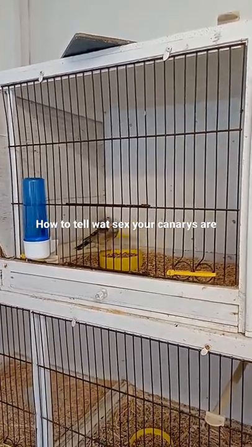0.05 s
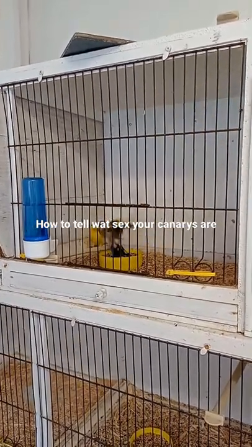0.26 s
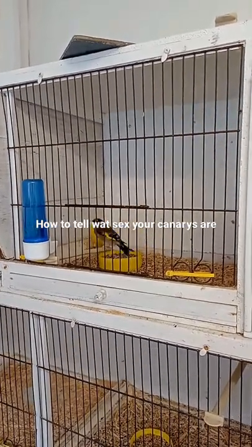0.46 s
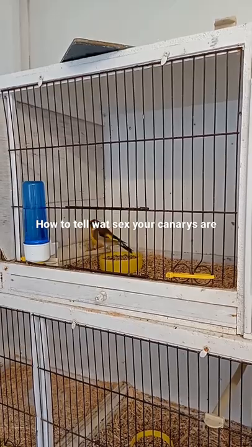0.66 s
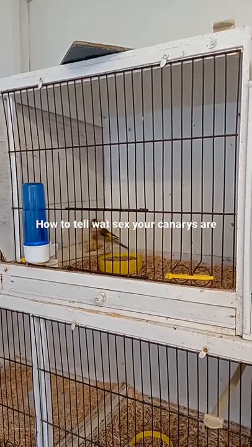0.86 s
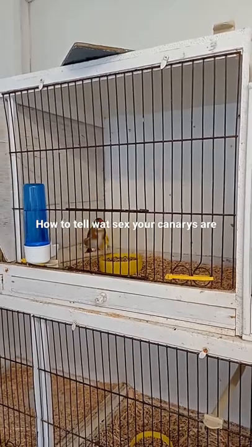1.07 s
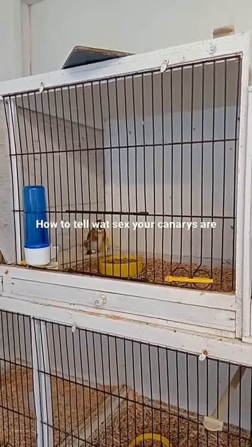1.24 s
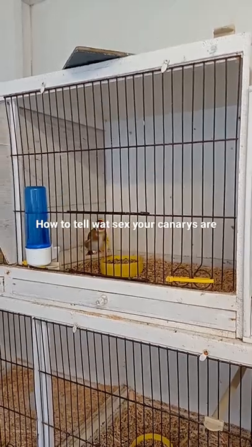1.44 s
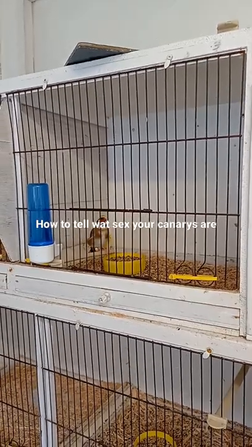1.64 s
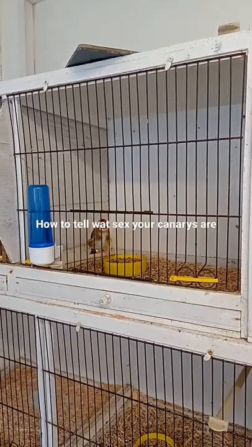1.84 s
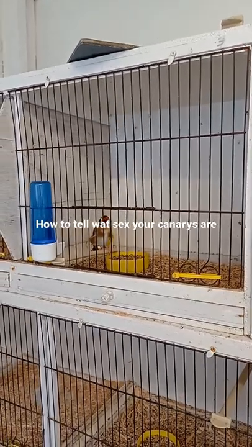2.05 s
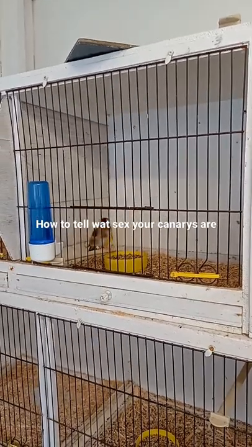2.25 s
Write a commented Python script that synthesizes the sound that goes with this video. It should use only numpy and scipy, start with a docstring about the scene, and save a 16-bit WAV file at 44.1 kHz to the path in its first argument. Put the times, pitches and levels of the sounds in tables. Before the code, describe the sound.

A small finch gives two sharp, high double ticks at about 0.2 and 0.4 seconds, the second louder, each echoing briefly. Its wings flutter and claws brush the cage wires until about 0.7 seconds. Scuffs and soft, hollow wooden knocks come around 1.5 and 1.8 seconds, and a faint, thin squeak near 2.2. Underneath is quiet room noise with a low boom that swells and sinks.

```python
"""A dull ring dies away over quiet room noise and a low boom that swells and sinks throughout.
A small finch in a wooden box cage gives two sharp double ticks, each note a very fast upward sweep
that reverberates in the cage and the room. It flutters by its dish, claws brushing the wires,
then scuffs about, and a few soft knocks excite the hollow modes of the wood.
A thin, faint squeak comes at the end."""
import sys
import numpy as np
from scipy import signal
from scipy.fft import rfft, irfft, next_fast_len
from scipy.io import wavfile

SR = 44100
rng = np.random.default_rng(int(sys.argv[2]) if len(sys.argv) > 2 else 0)


def dump_mix(stems):
    """Bounce the given channels to the path in sys.argv[1] as a 16-bit WAV at rate SR."""
    frames = np.atleast_2d(stems).T  # one column per channel
    limited = np.clip(frames, -1, 1)  # hard clip at full scale
    pcm = np.round(limited * 32767).astype(np.int16)
    wavfile.write(sys.argv[1], SR, pcm)


N = 101429
TIME = np.arange(N) / SR
SIZE = next_fast_len(N, real=True)
HZ = np.fft.rfftfreq(SIZE, 1 / SR)


def from_db(db):
    """Amplitude ratio: 20 dB to a factor of ten."""
    return np.exp(np.asarray(db) * (np.log(10) / 20))


def unit_rms(x):
    """Normalisation to unit mean power."""
    return x / np.sqrt(np.mean(x ** 2) + 1e-20)


def envelope(points):
    """Gain by linear interpolation of level between (t/s, level/dB) points."""
    return from_db(np.interp(TIME, *np.transpose(points)))


def coloured(x, spectrum, tilt_db=0):
    """Spectral shaping by a relative density and a tilt per octave, at unit rms."""
    octave = np.log2(np.maximum(HZ, 1))
    hz, db = np.transpose(spectrum)
    gain = from_db(np.interp(octave, np.log2(hz), db) + tilt_db * octave)
    return unit_rms(irfft(rfft(x, SIZE) * gain, SIZE)[:N])


def drift(rate_hz):
    """Low-pass filtered noise: a smooth random fluctuation of unit rms."""
    return unit_rms(irfft(rfft(rng.standard_normal(SIZE)) / (1 + (HZ / rate_hz) ** 2), SIZE)[:N])


def decay(t, t60):
    """Exponential damping: 60 dB in t60 seconds."""
    return np.exp(-np.log(1000) * np.maximum(t, 0) / t60)


def burst(start, db, attack, t60):
    """Transient envelope: linear rise, exponential decay."""
    rise = np.clip((TIME - start) / max(attack, 1 / SR), 0, 1)
    return from_db(db) * rise * decay(TIME - start - attack, t60)


def grains():
    """Random amplitude modulation, of spread 1 dB, makes noise slightly uneven."""
    return rng.standard_normal(N) * from_db(-drift(400))


def rustle(bursts, spectrum):
    """Superposed transient envelopes modulate one band of grainy noise."""
    return sum(burst(*row) for row in bursts) * coloured(grains(), spectrum)


# room noise: spectrum (f/Hz, level/dB) and course (t/s, level/dB)
ROOM_NOISE_SPECTRUM = [(20, -10), (45, 0.5), (70, -4.5), (100, -7.5), (150, -9.5), (205, -7), (270, -11),
                       (400, -16), (750, -16), (1200, -21), (1800, -24), (3000, -30.5), (4500, -36),
                       (6200, -44.5), (8000, -38), (10000, -35.5), (13500, -34), (15800, -38)]
ROOM_NOISE_LEVEL = [(0, -53), (.6, -56), (.95, -56), (1.5, -56.5), (2.0, -55), (2.3, -56.5)]
def room_noise():
    """Broadband noise, nearly stationary, strongest at low frequencies."""
    return envelope(ROOM_NOISE_LEVEL) * coloured(rng.standard_normal(N), ROOM_NOISE_SPECTRUM)


# swells of the boom: t/s, rms level/dB
BOOM_LEVEL = [(0, -61), (.21, -59), (.28, -49.5), (.42, -60), (.75, -59.5), (.9, -59.5), (1.07, -58.5),
              (1.125, -38), (1.19, -60), (1.265, -44.5), (1.32, -59), (1.39, -42), (1.45, -46), (1.52, -56),
              (1.69, -62.5), (1.8, -46.5), (1.92, -49.5), (2.0, -42.5), (2.07, -48.5), (2.12, -43.5),
              (2.19, -57.5), (2.25, -50), (2.3, -58)]
def boom(hz=62.9, waver_hz=3):
    """A low tone swells by amplitude modulation and wavers by frequency modulation."""
    phase = 2 * np.pi * np.cumsum(hz + waver_hz * drift(13)) / SR
    return envelope(BOOM_LEVEL) * np.sqrt(2) * np.sin(phase)


# dull ring: f/Hz, level/dB
RING_SPECTRUM = [(90, -6.5), (210, -2.5), (300, -1), (520, -1.5), (640, -11), (740, 4.5), (930, -2),
                 (1100, -14), (1800, -10), (2800, -19.5), (8000, -32.5)]
# hollow tones: t/s, f/Hz, level/dB, T60/s
HOLLOW_TONES = [(0, 200, -51, 0.5), (0, 520, -55.5, 0.302), (0, 745, -53.5, .9), (0, 895, -58, .8),
                (.385, 495, -52, 0.81), (.37, 790, -49, .2), (.37, 915, -56, 0.17)]
def room_ring():
    """Free decay: dull noise and faint hollow tones die away in the room."""
    ring = burst(0, db=-46.5, attack=.001, t60=.35) * coloured(rng.standard_normal(N), RING_SPECTRUM)
    tones = sum(burst(start, db, .01, t60) * np.sin(2 * np.pi * hz * TIME)
                for start, hz, db, t60 in HOLLOW_TONES)
    return ring + tones


# pieces of the squeak: t/s, duration/s, level/dB
SQUEAK_PIECES = [(2.158, 0.021, -63.5), (2.192, .033, -66), (2.237, 0.041, -62)]
# hiss around them: course (t/s, level/dB) and spectrum (f/Hz, level/dB)
SQUEAK_HISS_LEVEL = [(2.14, -100), (2.18, -71), (2.27, -69), (2.3, -74)]
SQUEAK_HISS_SPECTRUM = [(8000, -25), (11000, -2), (12400, -3), (13400, 1), (14500, -12)]
def squeak(hz=11680, waver_hz=110):
    """A very high tone with random frequency modulation sounds in three pieces, in a little hiss."""
    gain = sum(from_db(db) * np.sqrt(np.abs(np.sin(np.pi * np.clip((TIME - start) / length, 0, 1))))
               for start, length, db in SQUEAK_PIECES)
    tone = gain * np.sin(2 * np.pi * np.cumsum(hz + waver_hz * drift(280)) / SR)
    return tone + envelope(SQUEAK_HISS_LEVEL) * coloured(rng.standard_normal(N), SQUEAK_HISS_SPECTRUM)


# claw strokes: t/s, level/dB, attack/s, T60/s
CLAW_STROKES = [(0, -59, .001, .12), (.066, -60, .015, .3), (.102, -60, .002, .28), (.16, -62, .005, .15),
                (.353, -49, 0.0022, 0.12), (.523, -63, 0.0046, .15), (.598, -65, .003, .15),
                (1.09, -69.5, .003, .12), (1.52, -59, 0.0076, 0.34), (1.716, -58.5, .01, 0.55)]
# brushed wires: f/Hz, level/dB
WIRE_SPECTRUM = [(1000, -13), (3000, 0.5), (5000, -6.5), (7000, 4.5), (8300, 0), (9500, -16.5),
                 (15000, -12)]
def claws():
    """Friction of claws on the wires gives bursts of bright noise."""
    return rustle(CLAW_STROKES, WIRE_SPECTRUM)


# wing beats, feather swishes and air puffs: t/s, level/dB, attack/s, T60/s
WING_BEATS = [(0.081, -57, 0.036, 0.33), (.342, -54, 0.011, 0.37), (0.376, -51.5, 0.047, 0.24),
              (.52, -54, 0.0096, 0.3), (0.595, -56.5, 0.0021, 0.39), (1.12, -55, 0.013, 0.24),
              (1.26, -61.5, .005, .1)]
FEATHER_SWISHES = [(.064, -66, .004, .2), (.226, -49, .012, .32), (.352, -58.5, 0.0016, .15),
                   (.376, -46, 0.0024, .08), (.391, -36, .004, .16)]
AIR_PUFFS = [(.345, -49.5, .035, .13)]
# their spectra: f/Hz, level/dB
WING_SPECTRUM = [(100, -1.5), (340, -7), (500, 2), (650, -0.5), (850, 2.5), (1100, -9), (1450, -3.5),
                 (2300, -11), (4000, -14), (8000, -22), (15000, -29.5)]
FEATHER_SPECTRUM = [(2000, -15), (4300, 0.5), (6500, -3.5), (9500, 3.5), (11000, 0), (13200, -1.5),
                    (14000, -8.5), (15800, -17.5)]
PUFF_SPECTRUM = [(40, -14.5), (85, 1), (130, 0), (200, -14.5), (500, -36)]
def wings():
    """Aerodynamic noise of beating wings: a mid-range flutter, a high swish and a low puff."""
    flutter = rustle(WING_BEATS, WING_SPECTRUM)
    swish = rustle(FEATHER_SWISHES, FEATHER_SPECTRUM)
    return flutter + swish + rustle(AIR_PUFFS, PUFF_SPECTRUM)


# foot strokes: t/s, level/dB, attack/s, T60/s, tilt/(dB per octave)
FOOT_STROKES = [(1.484, -54.5, .006, 0.35, -0.9), (1.515, -49, 0.0033, 0.18, 0.2),
                (1.551, -45.5, 0.0017, .07, -.2), (1.567, -54, .002, .12, 3.5),
                (1.712, -54, 0.004, 0.29, 8), (1.741, -48.5, .016, 0.21, 2), (1.78, -48, .01, .19, 2)]
# their spectrum before the tilt: f/Hz, level/dB
SCUFF_SPECTRUM = [(90, -15), (250, 0), (900, 7), (1800, 6.5), (2700, -4.5), (4200, 2.5), (5500, -2),
                  (7500, 0.5), (9500, -3.5), (13000, -2.5), (15800, -2)]
def scuffs():
    """Sliding friction of the feet gives dry noise, each stroke with its own brightness."""
    return sum(burst(start, db, attack, t60) * coloured(grains(), SCUFF_SPECTRUM, tilt)
               for start, db, attack, t60, tilt in FOOT_STROKES)


# impacts: t/s, level/dB, gain of the lowest mode/dB, gain of the modes above 1 kHz/dB
IMPACTS = [(1.518, -38, -4, 3), (1.5265, -56, -5, 15), (1.5405, -51.5, -8, 1), (1.554, -54, -18, 8),
           (1.7415, -44, -12, -10), (1.7475, -40.5, -9, -6), (1.769, -41.5, -15, -11),
           (1.787, -42.5, 0.5, -5), (1.815, -45.5, 9.5, -8), (1.85, -50.5, 17, -6)]
# modes of the woodwork: f/Hz, level/dB, T60/s
WOOD_MODES = [(200, -12, 0.54), (253.5, -17, 0.19), (380, -13.5, 0.086), (484, -10, 0.15), (547, -4, 0.11),
              (595.3, -5.5, 0.31), (637, -3.5, 0.094), (817, -16.5, 0.094), (1080, -36, 0.1),
              (1410, -18, .07), (1640, -18.5, 0.076), (1822, -13, 0.075), (2010, -20.5, .08)]
def knocks(contact_s=.0011):
    """Modal vibration: soft impacts excite the wood's damped modes, a little differently each time."""
    out, t = np.zeros(N + SR), TIME[:SR // 2]
    rise = 1 - np.exp(-t / contact_s)
    for onset, db, low_db, high_db in IMPACTS:
        start = int(onset * SR)
        for k, (hz, mode_db, t60) in enumerate(WOOD_MODES):
            gain = from_db(db + mode_db + low_db * (k == 0) + high_db * (hz > 1000) + rng.normal(0, 1))
            mode = decay(t, t60) * np.sin(2 * np.pi * hz * t + rng.normal(0, 1))
            out[start:start + len(t)] += gain * rise * mode
    return out[:N]


# early reflections off the cage walls: delay t/s, level/dB
WALL_REFLECTIONS = [(.0011, -15), (.0024, -7), (.0033, -14.5), (.0078, -17)]
# faint high ringing tones that colour the tail of each tick: f/Hz, relative level/dB
TICK_TAIL_TONES = [(2720, 6.5), (3020, 7), (3618, -5), (4100, 0), (4678, 0), (5839, 2.5), (6442, 5),
                   (6739, -1.5), (7052, 12), (7440, -2), (7572, 0), (7825, -3.5), (7903, -5), (7967, -0.5),
                   (8200, 0), (8354, 2.5), (8440, 10)]
# reverberation of the room: f/Hz, level/dB
REVERB_SPECTRUM = [(200, -0.5), (1000, -4.5), (2900, 8), (4200, -1), (5500, 2.5), (7500, -4), (10000, 0),
                   (13000, 2), (16000, 2)]
def cage_and_room(x, cage_db=-2.5, room_db=-7.5):
    """Convolution with an impulse response: direct sound, reflections, reverberation, faint tones."""
    response = np.zeros(N)
    response[0] = 1
    for delay, db in WALL_REFLECTIONS:
        response[int(delay * SR)] += from_db(db)
    cage_tail = rng.standard_normal(N) * burst(.001, 0, attack=.002, t60=.1)
    room_tail = coloured(rng.standard_normal(N), REVERB_SPECTRUM) * burst(.0091, 0, attack=.008, t60=.27)
    # each tail's energy is set relative to the direct sound
    response += (from_db(cage_db) * unit_rms(cage_tail) + from_db(room_db) * unit_rms(room_tail)) / N**.5
    tones = sum(from_db(db) * np.sin(2 * np.pi * (hz * TIME + rng.random()))
                for hz, db in TICK_TAIL_TONES)
    response += burst(.002, db=-58.5, attack=.0047, t60=.16) * tones
    return signal.fftconvolve(x, response)[:N]


# notes: peak t/s, level/dB, pitch ratio, octave/dB, rasp/dB; opening tone f/Hz, level/dB; hiss/dB
CALL_NOTES = [(0.2128, -22, 0.99, -42, -27.5, 3550, -30.5, -15.5),
              (0.2261, -19, 1.024, -38.5, -26.5, 3550, -25.5, -17),
              (0.3790, -13.3, 1.01, -31, -21.5, 4100, -16, -22),
              (0.3923, -10, 1.02, -25, -18, 4150, -18.5, -18)]
# sweep common to all notes: t/s from the peak, f/Hz before the pitch ratio, level/dB
NOTE_SWEEP = [(-.0032, 4600, -26), (-.0021, 5600, -13), (-.0011, 6650, -5), (0, 7750, 0), (.0007, 8300, -5),
              (.0014, 8650, -30)]
# opening hiss: f/Hz, level/dB
OPENING_SPECTRUM = [(2000, -24.5), (2800, -3.5), (5000, -2.5), (8000, -2), (10000, -4), (12000, -11.5),
                    (15500, -26)]
def finch_calls(lead_s=.0031, opening_s=.0011, rise_hz_per_s=500000, rasp_width_hz=2600):
    """Frequency sweep: each note opens with a lower, hissy catch and glides up within milliseconds."""
    out = np.zeros(N)
    sweep_t, sweep_hz, sweep_db = np.transpose(NOTE_SWEEP)
    hiss = coloured(rng.standard_normal(N), OPENING_SPECTRUM)
    rasp_sin, rasp_cos = drift(rasp_width_hz), drift(rasp_width_hz)
    for peak, db, ratio, octave_db, rasp_db, low_hz, low_db, hiss_db in CALL_NOTES:
        t = TIME - peak
        phase = 2 * np.pi * np.cumsum(ratio * np.interp(t, sweep_t, sweep_hz)) / SR
        gain = from_db(np.interp(t, sweep_t, sweep_db)) * (t > sweep_t[0]) * (t < sweep_t[-1])
        # noise sidebands follow the pitch
        rasp = from_db(rasp_db) * (rasp_sin * np.sin(phase) + rasp_cos * np.cos(phase))
        sweep = gain * (np.sin(phase) + from_db(octave_db) * np.sin(2 * phase) + rasp)
        t_open = t + lead_s
        low_tone = from_db(low_db) * np.sin(2 * np.pi * t_open * (low_hz + .5 * rise_hz_per_s * t_open))
        opening = np.exp(-(t_open / opening_s) ** 2) * (low_tone + from_db(hiss_db) * hiss)
        out += from_db(db) * (opening + sweep)
    return out


def scene():
    """Superposition of all sources at one point; only the calls pass through the reverberation."""
    calls = cage_and_room(finch_calls())
    movement = knocks() + scuffs() + wings() + claws()
    return (calls + movement + squeak() + room_noise() + boom() + room_ring())[None]


def record(dry):
    """Band limiting: a steep low-pass filter removes the highest treble."""
    low_pass = signal.firwin(numtaps=511, cutoff=15850, fs=SR, window="blackman")
    return signal.fftconvolve(dry, low_pass[None], "same")


dry = scene()
out = record(dry)
dump_mix(out)
```